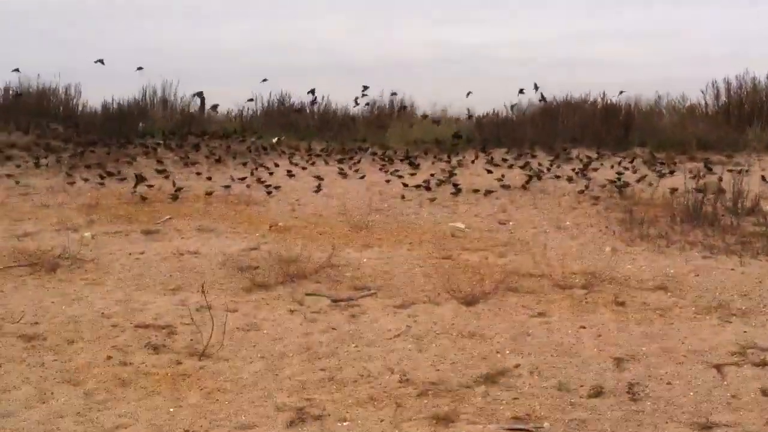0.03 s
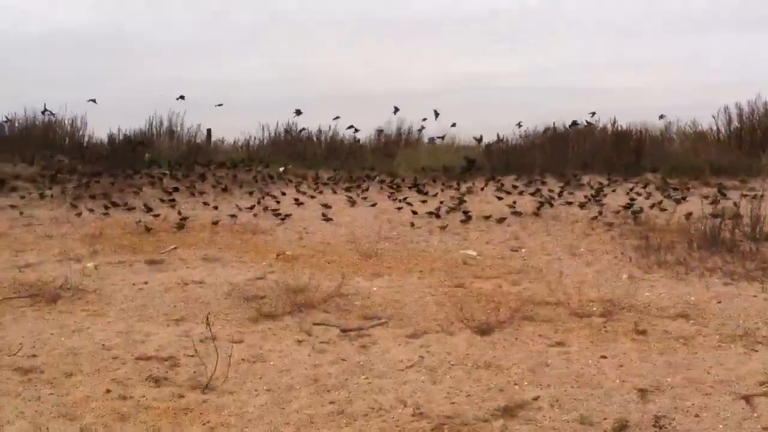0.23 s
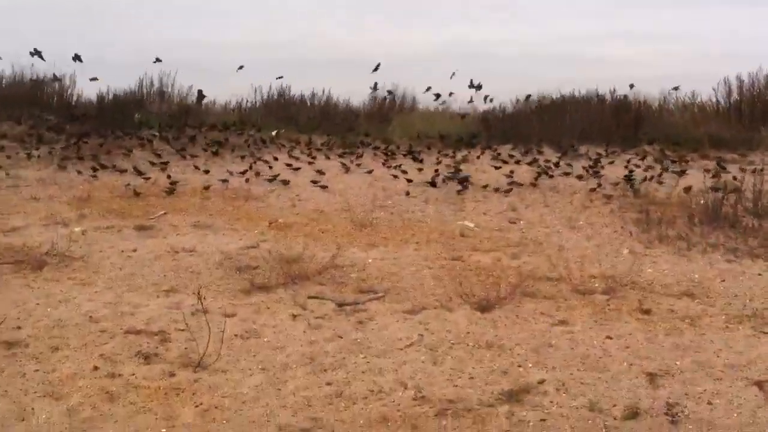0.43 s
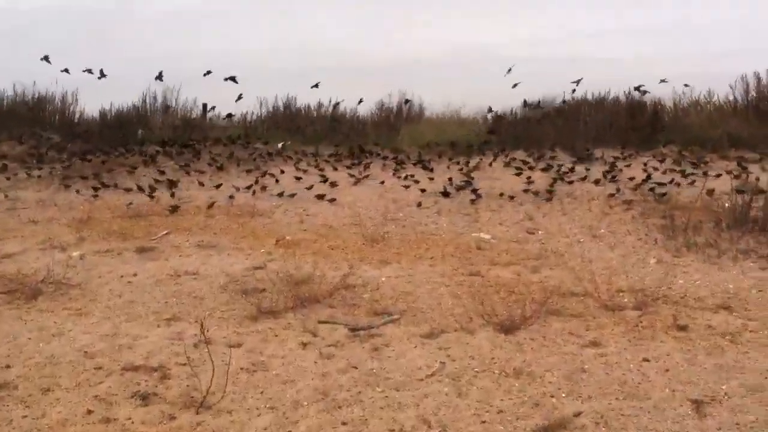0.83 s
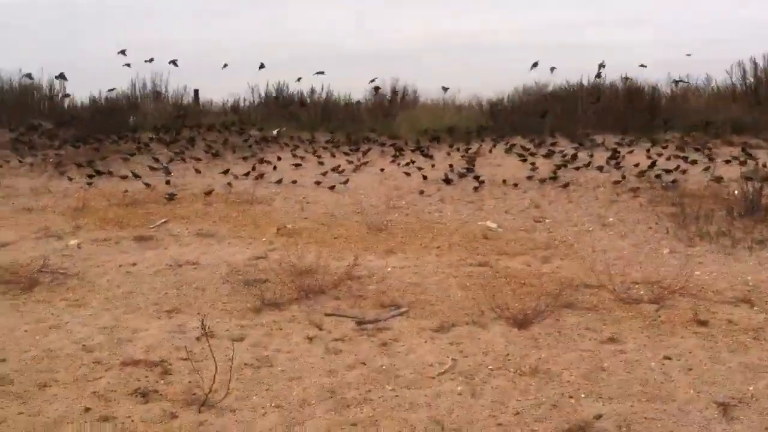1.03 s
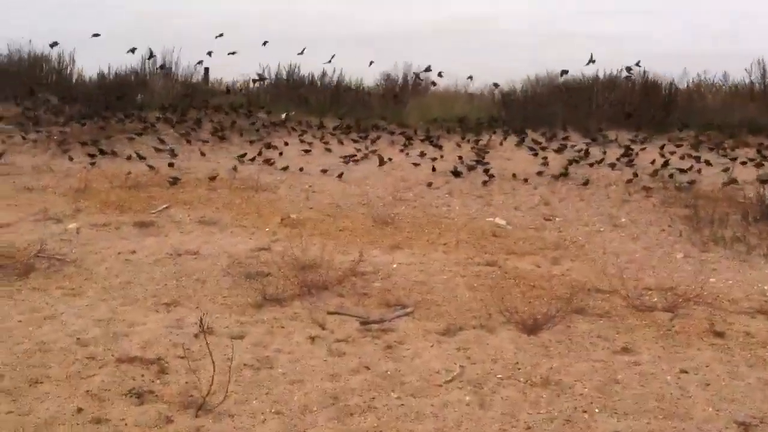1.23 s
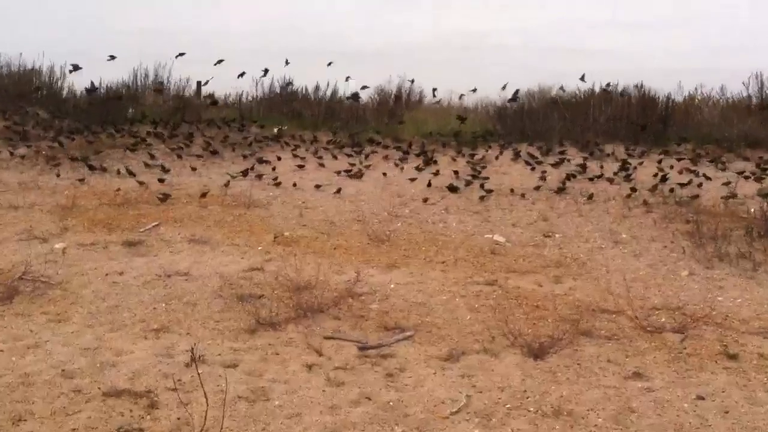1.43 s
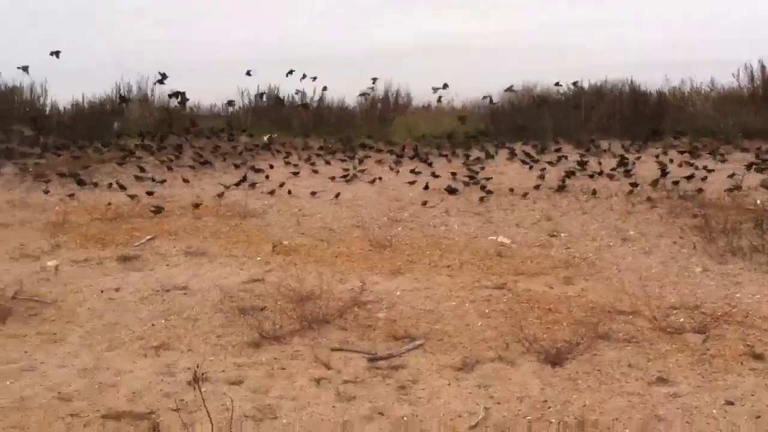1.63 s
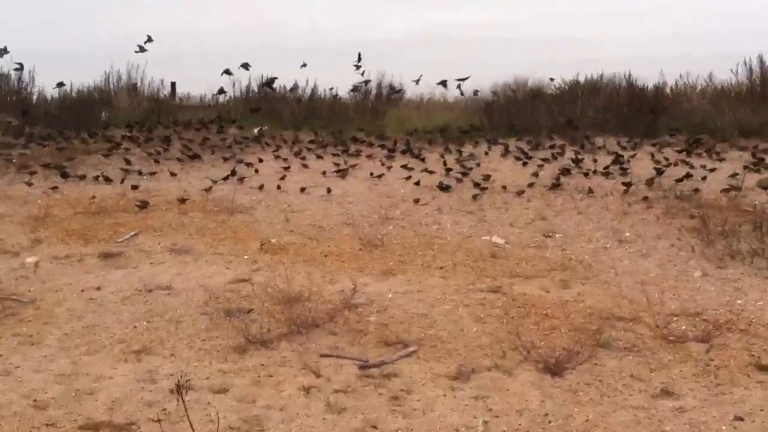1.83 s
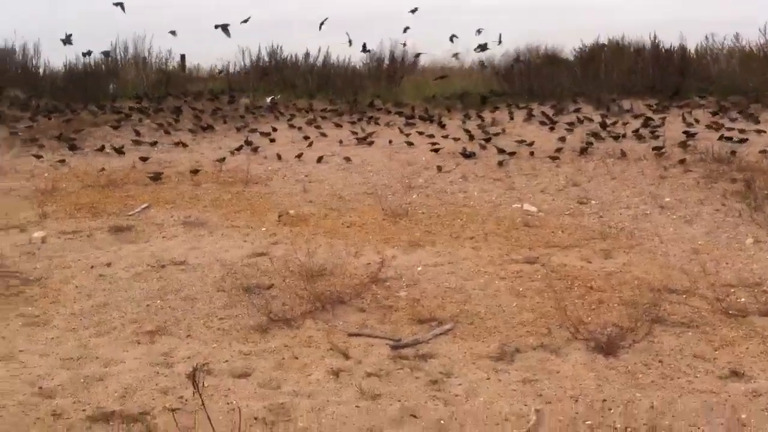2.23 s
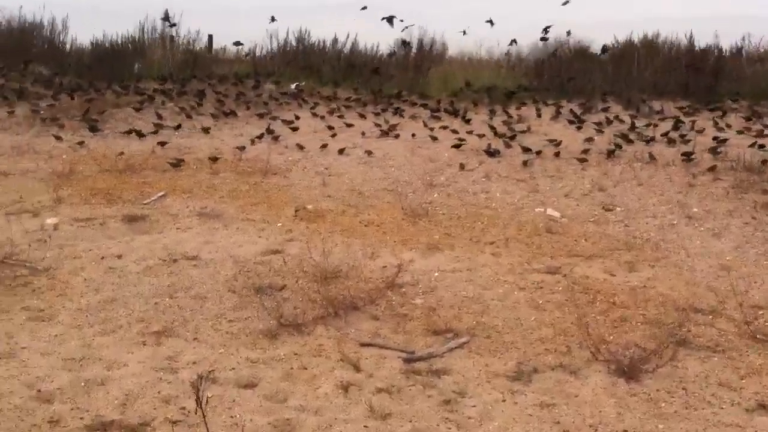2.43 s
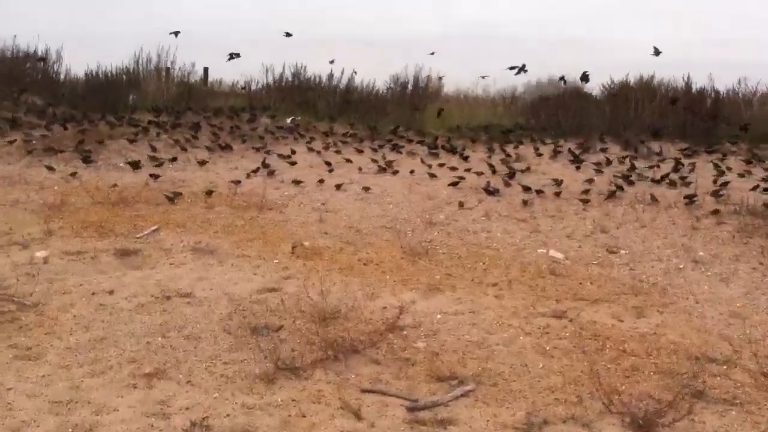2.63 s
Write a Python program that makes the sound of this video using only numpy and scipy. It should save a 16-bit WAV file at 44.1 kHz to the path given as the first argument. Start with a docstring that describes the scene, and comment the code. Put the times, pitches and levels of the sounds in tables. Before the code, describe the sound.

Shoes crunching slowly over sandy ground while a hand bumps and rubs the microphone.

```python
"""Slow steps on a sandy field.

Shoes crunch and scrape the sand, pebbles and twigs tick, kicked grains trickle back.
A hand bumps and rubs the case of the camera it carries, and clothing swishes.
Light wind hisses in dry grass and buffets the microphone; a distant flock chirps thinly."""
import sys
import numpy as np
from scipy.fft import rfft, irfft, next_fast_len
from scipy.io import wavfile
from scipy.ndimage import map_coordinates

SR = 44100
rng = np.random.default_rng(int(sys.argv[2]) if len(sys.argv) > 2 else 0)


def master_out(mix):
    """Clip the mix to full scale and print it as 16-bit PCM to the path in sys.argv[1]."""
    frames = np.transpose(np.atleast_2d(mix))
    ceiling = np.clip(frames, -1, 1)
    pcm = np.round(ceiling * 32767).astype(np.int16)
    wavfile.write(sys.argv[1], SR, pcm)


N = 119070
TIME_S = np.arange(N) / SR


def amp(db):
    """Decibels to gain."""
    return 10 ** (np.asarray(db) / 20)


def unit(x):
    """Scale to rms 1."""
    return x / np.sqrt(np.mean(x ** 2) + 1e-20)


def curve(points):
    """Join (t/s, value) points."""
    return np.interp(TIME_S, *np.transpose(points))


def wobble(knots_per_s):
    """Smooth random curve."""
    return map_coordinates(rng.standard_normal(4096), [TIME_S * knots_per_s], mode="wrap")


def filtered(x, response):
    """Apply a complex frequency response."""
    size = next_fast_len(N + SR // 2)
    return irfft(rfft(x, size) * response(np.fft.rfftfreq(size, 1 / SR)), size)[:N]


def coloured(x, colour):
    """Shape x by (f/Hz, level/dB) points; rms 1."""
    f, db = np.transpose(colour)
    return unit(filtered(x, lambda hz: amp(np.interp(np.log(hz + 1), np.log(f), db))))


def noise(colour):
    """Coloured noise, rms 1."""
    return coloured(rng.standard_normal(N), colour)


def stroke(start_s, rise_s, hold_s, fall_s):
    """Swell, hold, then drop 20 dB per fall_s; a negative fall cuts off."""
    t = TIME_S - start_s
    swell = np.clip(t / max(rise_s, 1e-3), 0, 1) ** 1.22
    return swell * amp(-20 * np.maximum(t - rise_s - hold_s, 0) / max(fall_s, 1e-3))


def grains(colour, hiss=0.64, per_s=2500, spread_db=3.5):
    """Dense, uneven grain contacts over a smooth hiss."""
    hits = rng.random(N) < per_s / SR
    sizes = amp(spread_db * np.minimum(rng.exponential(size=N), 4))
    signs = np.sign(rng.standard_normal(N))
    return coloured(unit(hits * sizes * signs) + hiss * rng.standard_normal(N), colour)


# fine grit spectrum: f/Hz, level/dB
GRIT_COLOUR = [(1200, -35), (2600, 0), (3500, -3.5), (4900, 3), (6500, -4.5), (8000, -4), (9700, -17.5),
               (12500, -16.5), (15500, -44)]

def sole(strokes, colour):
    """Each stroke of a shoe crunches the sand and sprays finer grit."""
    crunch, grit = grains(colour), grains(GRIT_COLOUR)
    return sum(stroke(*timing) * (amp(crunch_db) * crunch + amp(grit_db) * grit)
               for *timing, crunch_db, grit_db in strokes)


# light strokes: t/s, rise/s, hold/s, fall/s, crunch/dB, grit/dB
SCUFFS = [(.243, 0.0068, 0.035, 0.13, -44, -48), (.668, 0.011, 0.041, -0.73, -52, -66),
          (.9, 0.0048, 0.0071, 0.06, -47.5, -54.5), (1.015, 0.016, 0.07, 0.03, -52.5, -59),
          (1.292, 0.0144, 0.0095, -0.4, -53.5, -60.5), (1.522, 0.023, 0.055, 0.12, -52.5, -60),
          (1.876, 0.0049, .033, 0.14, -53.5, -60), (2.076, 0.005, 0.0083, 0.48, -51, -55.5),
          (2.522, 0.0053, .004, 0.2, -51, -60.5)]
# crunch spectrum: f/Hz, level/dB
CRUNCH_COLOUR = [(250, -52), (600, -9), (1000, -5.5), (1600, 2.5), (2000, -1), (2500, -11.5), (3500, -33.5),
                 (7000, -59)]

def scuffs():
    """Shoes brush over the sand."""
    return sole(SCUFFS, CRUNCH_COLOUR)


# heavy strokes: t/s, rise/s, hold/s, fall/s, crunch/dB, grit/dB
SCRAPES = [(.839, .038, .009, .028, -29, -44.5), (1.571, .008, .003, .018, -48, -66),
           (1.596, .008, .003, .018, -49, -66)]
# scrape spectrum: f/Hz, level/dB
SCRAPE_COLOUR = [(150, -23), (400, -8), (580, -2), (800, -5), (1050, -5), (1500, 1.5), (1900, -3.5),
                 (2300, -14.5), (3200, -43), (6000, -60)]

def scrapes(echo_s=0.007, echo_gain=0.24):
    """A loaded sole scrapes deeper, hollowed by one ground reflection."""
    direct = sole(SCRAPES, SCRAPE_COLOUR)
    return filtered(direct, lambda hz: 1 + echo_gain * np.exp(-2j * np.pi * hz * echo_s))


# heel spectrum: f/Hz, level/dB
HEEL_COLOUR = [(150, -18), (400, 2), (600, -2.5), (900, -3), (1300, -7), (2000, -15.5), (3000, -27),
               (6000, -52)]

def heel(level_db=-40):
    """A heel packs the sand with a dull crunch."""
    envelope = stroke(start_s=1.8745, rise_s=0.003, hold_s=0.005, fall_s=0.05)
    return amp(level_db) * envelope * grains(HEEL_COLOUR)


# cracks: t/s, dull peak/dB, bright peak/dB
TICKS = [(0.2524, -26, -33), (0.9264, -38, -27), (0.9345, -59, -37), (0.943, -68, -51), (1.346, -51, -43.5)]

def ticks(attack_s=0.0011, t60_s=0.0086):
    """Pebbles and twigs crack, each with a dull and a bright part."""
    dull, bright = noise(CRUNCH_COLOUR), noise(GRIT_COLOUR)
    out = np.zeros(N)
    for start_s, dull_db, bright_db in TICKS:
        t = TIME_S - start_s
        envelope = np.clip(t / attack_s, 0, 1) * amp(-60 * np.abs(t) / t60_s)
        for band, peak_db in ((dull, dull_db), (bright, bright_db)):
            crack = band * envelope
            out += amp(peak_db) * crack / np.abs(crack).max()
    return out


# falling sand: t/s, rise/s, hold/s, fall/s, level/dB
TRICKLES = [(0.115, 0.0036, 0.0036, 0.18, -63), (0.365, 0.013, 0.018, 0.44, -65.5),
            (0.917, 0.0086, 0.084, 0.35, -64.5), (1.121, 0.0021, 0.0023, 0.08, -65.5),
            (1.544, .02, 0.027, .06, -67)]
# trickle spectrum: f/Hz, level/dB
TRICKLE_COLOUR = [(3000, -41), (6000, -3), (7800, 3.5), (9700, -6), (12000, -8), (14000, -14), (15500, -18)]

def trickles():
    """Kicked grains fall back after a step."""
    envelope = sum(amp(db) * stroke(*timing) for *timing, db in TRICKLES)
    return envelope * grains(TRICKLE_COLOUR, hiss=0.27)


# finger bumps: t/s, peak/dB, contact corner/Hz
BUMPS = [(.045, -41.5, 151), (.17, -30.5, 390), (.216, -27.5, 460), (0.254, -26.5, 262), (.273, -30.5, 220),
         (0.308, -22, 437), (.506, -24.5, 226), (0.5219, -16, 407), (0.549, -24, 218), (.596, -23.5, 194),
         (.605, -26.5, 303), (.676, -23, 280), (.77, -34, 207), (.808, -30.5, 238), (0.91, -25, 206),
         (0.941, -27.5, 265), (.972, -33, 220), (1.025, -32, 180), (1.081, -31, 198), (1.134, -38.5, 170),
         (1.29, -38.5, 150), (1.347, -42, 150), (1.401, -32, 400), (1.432, -24.5, 280), (1.469, -32, 377),
         (1.491, -34, 296), (1.811, -24.5, 165), (1.83, -24.5, 169), (1.842, -26, 236), (1.865, -27, 620),
         (1.876, -21.5, 407), (1.891, -29, 354), (1.917, -35.5, 500), (1.995, -30, 228),
         (2.027, -33.5, 288), (2.062, -36, 180), (2.083, -33, 162), (2.321, -28, 203), (2.331, -29, 208),
         (2.534, -39, 198), (2.633, -40, 172)]

def bumps(case_hz=180, width_hz=238, low_cut_hz=110, high_cut_hz=860):
    """A finger's push, softened by its contact, rings the damped case for a cycle or two."""
    size, lead = 4096, 256  # samples
    hz = np.fft.rfftfreq(size, 1 / SR)
    s = 1j * hz
    resonance = s * width_hz / (case_hz ** 2 + s * s + s * width_hz)
    low_cut = s * s / (low_cut_hz ** 2 + s * s + s * low_cut_hz)
    high_cut = 1 / (1 + (hz / high_cut_hz) ** 4)
    out = np.zeros(N + SR)
    for at_s, peak_db, contact_hz in BUMPS:
        contact = s / (s + contact_hz) / (1 + (hz / contact_hz) ** 3.7)
        thud = np.roll(irfft(contact * resonance * low_cut * high_cut), lead)
        out[round(at_s * SR) - lead:][:size] += amp(peak_db) * thud / np.abs(thud).max()
    return out[:N]


# grip friction: t/s, level/dB re gain_db
RUB_LEVELS = [(0, -59.5), (.09, -50), (.19, -33.5), (.3, -31), (.36, -40.5), (.46, -43.5), (.55, -33),
              (.64, -44), (.69, -38), (.74, -64), (.82, -52.5), (.87, -34), (1.0, -40), (1.14, -39),
              (1.2, -62.5), (1.33, -56), (1.44, -34.5), (1.53, -42), (1.6, -55.5), (1.67, -48.5),
              (1.72, -36), (1.78, -46.5), (1.85, -33), (1.94, -43), (2.1, -41), (2.15, -54.5),
              (2.28, -45.5), (2.4, -34.5), (2.46, -58), (2.7, -53.5)]
# rub spectrum: f/Hz, level/dB
RUB_COLOUR = [(25, -40), (50, -26), (80, -14.5), (115, 0), (160, 2), (240, -5), (330, -14), (480, -23.5),
              (700, -38), (1500, -70)]

def rubbing(gain_db=-1.5, flutter_db=1.5):
    """The grip creeps on the case: a low, fluttering rumble in swells."""
    rumble = noise(RUB_COLOUR) * amp(flutter_db * wobble(45))
    return amp(curve(RUB_LEVELS) + gain_db) * unit(rumble)


# sleeve spectrum: f/Hz, level/dB
SWISH_COLOUR = [(300, -19), (1000, -10.5), (1600, 8.5), (2000, 5.5), (2700, -2.5), (3700, -6.5), (5300, -2),
                (6700, -0.5), (8500, -9), (9700, -24), (12500, -29), (15500, -44)]

def swish(level_db=-47):
    """A sleeve slides once over fabric."""
    envelope = stroke(start_s=2.305, rise_s=0.052, hold_s=0.036, fall_s=0.055)
    return amp(level_db) * envelope * noise(SWISH_COLOUR)


# clothing and grass: t/s, level/dB re gain_db
RUSTLE_LEVELS = [(0, -53), (.24, -53), (.41, -54), (.6, -57), (.72, -57), (.8, -59), (.95, -55),
                 (1.1, -66.5), (1.14, -58.5), (1.19, -66), (1.3, -60.5), (1.48, -61), (1.64, -61),
                 (1.8, -59.5), (1.93, -59.5), (2.02, -56.5), (2.15, -54), (2.25, -58.5), (2.3, -57.5),
                 (2.48, -57.5), (2.58, -57.5), (2.7, -54.5)]
# rustle spectrum: f/Hz, level/dB
RUSTLE_COLOUR = [(100, -19), (400, 4), (800, 6), (1600, 4.5), (2100, 4), (2700, 0), (3500, 0.5),
                 (5000, -2.5), (8000, -7.5), (9700, -19.5), (12500, -23.5), (15500, -37)]

def rustle(gain_db=2, flutter_db=0.85):
    """Clothing and dry grass give a grainy hiss."""
    texture = grains(RUSTLE_COLOUR, hiss=1.5)
    return texture * amp(curve(RUSTLE_LEVELS) + gain_db + flutter_db * wobble(29.3))


# bird calls: t/s, length/s, start/Hz, end/Hz, level/dB
CHIRPS = [(.966, .02, 4250, 4450, -60), (1.04, .048, 4350, 5300, -57.5), (1.878, .04, 4850, 5150, -61),
          (2.578, .02, 4350, 4050, -59)]

def birds(waver_hz=100):
    """Thin, wavering glides from the far flock."""
    out, waver = np.zeros(N), waver_hz * wobble(350)
    for start_s, length_s, from_hz, to_hz, db in CHIRPS:
        progress = np.clip((TIME_S - start_s) / length_s, 0, 1)
        envelope = np.sqrt(2 * np.abs(np.sin(np.pi * progress)))
        pitch_hz = from_hz + (to_hz - from_hz) * progress + waver
        out += amp(db) * envelope * np.sin(2 * np.pi * np.cumsum(pitch_hz) / SR)
    return out


# buffet spectrum: f/Hz, level/dB
BUFFET_COLOUR = [(25, -32), (50, -21), (80, 0.5), (110, 3), (160, -3), (260, -21), (600, -49)]

def buffet(level_db=-59.5, swing_db=6):
    """Light wind rumbles on the microphone port."""
    return amp(level_db + swing_db * wobble(3.22)) * noise(BUFFET_COLOUR)


# breeze spectrum: f/Hz, level/dB
BREEZE_COLOUR = [(20, -25), (60, 3.5), (150, -1), (400, -2.5), (800, -9), (1600, -7), (2600, -27.5),
                 (7000, -20.5), (10000, -26), (15500, -42)]

def breeze(level_db=-60.5, swing_db=1.3):
    """A nearly steady bed of wind over the field."""
    return amp(level_db + swing_db * wobble(4.83)) * noise(BREEZE_COLOUR)


def scene():
    """All sources at one microphone in the open air."""
    steps = scuffs() + scrapes() + heel() + ticks() + trickles()
    handling = bumps() + rubbing()
    background = swish() + rustle() + birds() + buffet() + breeze()
    return (steps + handling + background)[None]


BAND_LIMIT_HZ = 15700

def record(dry):
    """The camera keeps nothing above its band limit."""
    return filtered(dry[0], lambda hz: hz < BAND_LIMIT_HZ)[None]


dry = scene()
out = record(dry)
master_out(out)
```